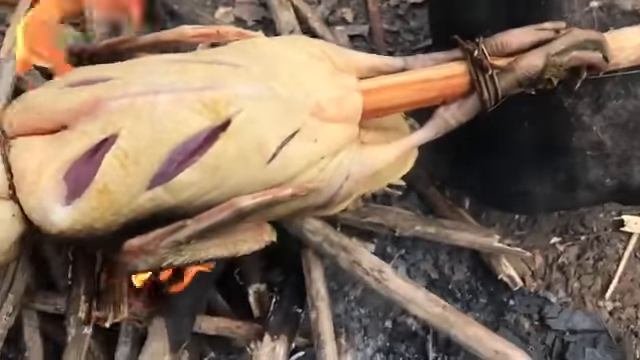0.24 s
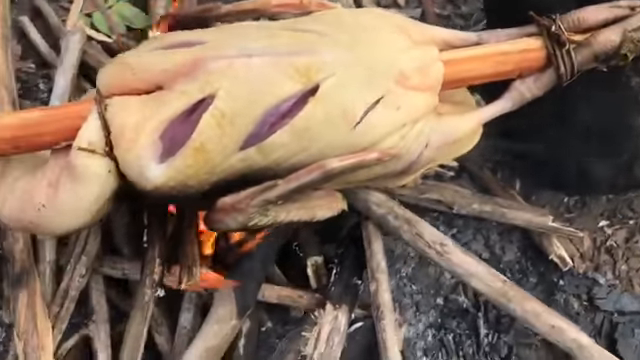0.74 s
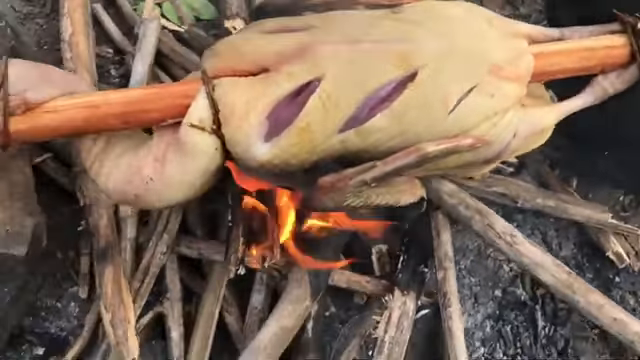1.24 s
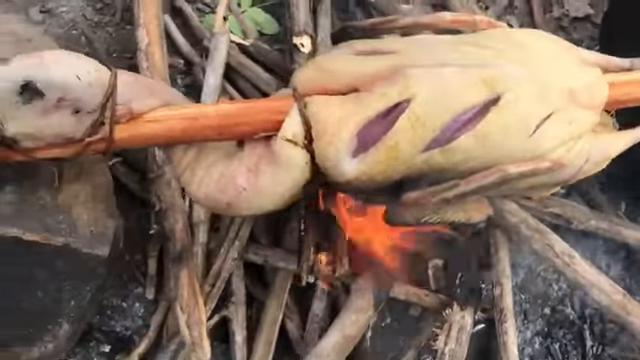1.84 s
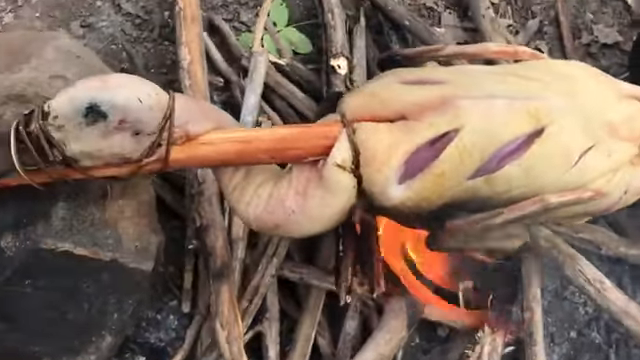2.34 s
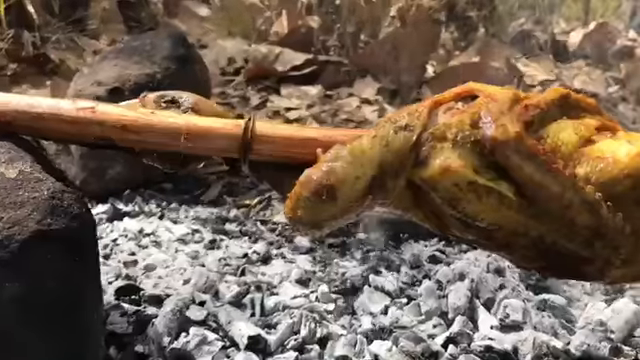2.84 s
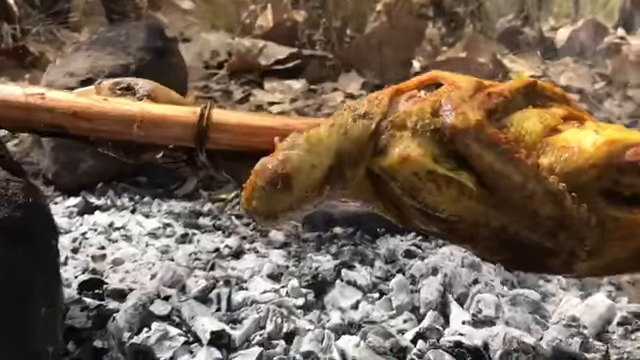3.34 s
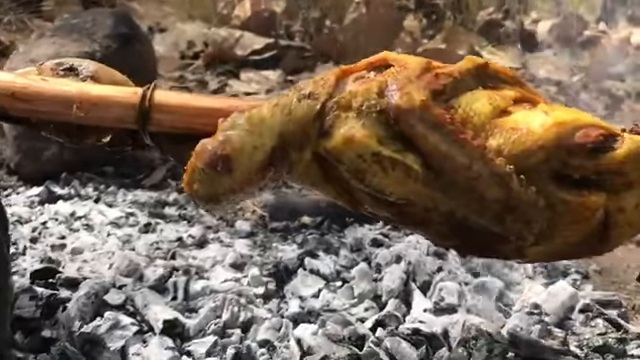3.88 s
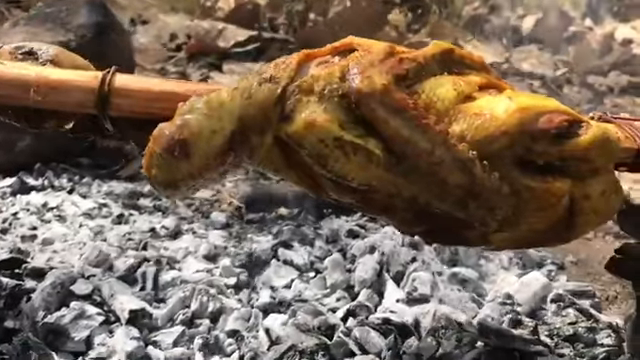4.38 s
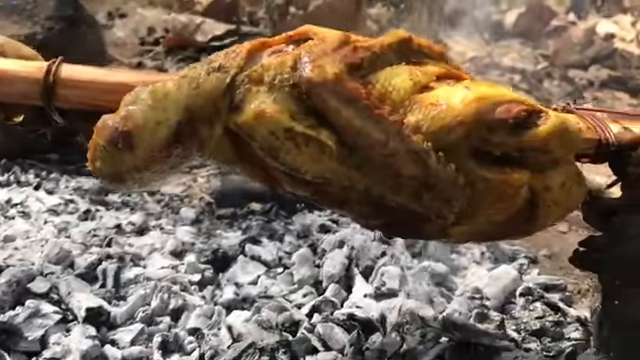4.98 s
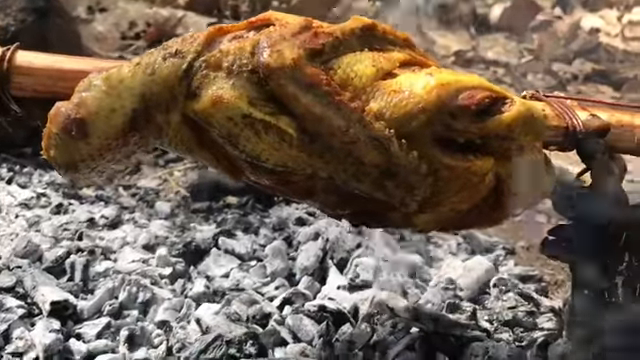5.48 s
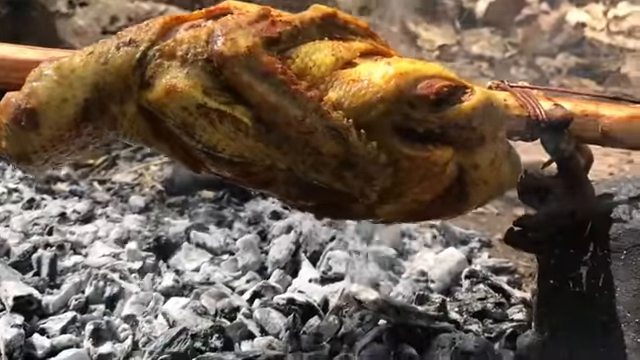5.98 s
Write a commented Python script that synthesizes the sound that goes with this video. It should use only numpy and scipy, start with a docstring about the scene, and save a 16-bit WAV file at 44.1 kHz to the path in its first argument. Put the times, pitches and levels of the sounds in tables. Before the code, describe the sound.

First, burning sticks snap sharply near the microphone, loudest at the start and twice later, amid pattering crackle, sap spits and two rising steam jets above soft low roaring. An abrupt cut and a blink of silence follow. Then a duck over coals sizzles continuously and evenly, with quick fizzing bursts of fat, sparse crisp pops and faint low outdoor wash, without room echo.

```python
"""Loud cracks of burning wood over the deep flutter of flames: a duck roasts outdoors, in mono, in two parts.
First a stick fire: rung fractures crack, showers and fine crackle patter, and shaped noise makes flames and steam.
After a short silence, a bed of coals: a steady frying hiss over a low breeze, made of coloured noise.
Drops of fat spatter in tiny ringing bursts and die away; sharp pops are short fractures rung by the coal bed."""
import sys
import numpy as np
from scipy import signal
from scipy.fft import rfft
from scipy.io import wavfile
from scipy.ndimage import uniform_filter1d, map_coordinates

SR = 44100
rng = np.random.default_rng(int(sys.argv[2]) if len(sys.argv) > 2 else 0)


def unload_audio(sound):
    """Save the sound as a 16-bit wav file, at the path given as the first command line argument."""
    columns = np.transpose(np.atleast_2d(sound))
    # keep every value between -1 and 1, then stretch to whole-number steps
    steps = np.round(np.clip(columns, -1, 1) * 32767)
    wavfile.write(sys.argv[1], SR, steps.astype(np.int16))


N = 274302
TIME, BINS = np.arange(N) / SR, np.fft.rfftfreq(4096, 1 / SR)  # s, Hz
FIRE_END_S, COALS_START_S = 2.614, 2.662
EDGE_HZ, HISS_EDGE_HZ = 15500, 15050  # top of the whole sound, top of the hisses


# Loud cracks of burning wood and charcoal: (time [s], snap level [dB], length [s], brightness [dB],
# leading ring [Hz], thump level [dB], thump pitch before a random rise of up to 5 % [Hz])
CRACKS = [(.0275, -33.5, 0.0021, -8, 1580, -38, 605), (0.0329, -34, 0.0018, -2, 1550, -40, 348),
          (.1714, -45.5, .0012, 2, 3770, -69, 180), (0.4076, -54, 0.00067, -2, 1450, -74, 231),
          (0.5095, -44.5, 0.00077, 14, 1530, -51.5, 555), (0.5293, -45.5, 0.0034, 1, 3520, -73, 300),
          (0.894, -66, 0.0055, 10, 4600, -50.5, 132), (0.9814, -46.5, 0.0011, -1, 3280, -58, 686),
          (1.292, -31, 0.0019, -1, 1620, -35, 516), (1.2963, -35, .0018, -7, 1650, -37, 240),
          (1.446, -47, 0.0011, 7, 3070, -74, 141), (1.4803, -52.5, 0.0017, 5, 4840, -53, 129),
          (1.619, -52, 0.00072, -6.5, 1630, -54, 630), (1.7142, -54.5, .007, -5, 2800, -48, 253),
          (1.87, -42, 0.0066, -1.5, 2680, -55, 200), (1.9152, -42, 0.0054, -9, 1660, -38.5, 547),
          (1.937, -54.5, .0009, 9, 3370, -64, 410), (2.118, -30.5, 0.0045, 1.5, 3070, -39, 141),
          (2.1622, -40.5, 0.011, -3, 2870, -45.5, 550), (2.1804, -43.5, .0013, -4, 3030, -41, 292),
          (2.2834, -52.5, 0.00066, 7, 3900, -55.5, 215), (2.304, -53.5, 0.0038, 0, 3750, -64, 200),
          (2.4712, -44.5, 0.0023, -2.5, 3470, -47.5, 317), (2.5974, -37.5, .0014, -5, 3350, -46, 256),
          (5.691, -43, 0.014, 5, 3300, -57.5, 215)]
# Faint cracks, one at a random moment in each slot
TICKS_PER_S, TICK_DB, TICK_SPREAD_DB = 9, -58, 3
TICK_S, TICK_BRIGHT_DB, TICK_RING_HZ = 0.0017, 3.5, 3300  # middle length and brightness; leading ring
TICK_THUMP_DB, TICK_THUMP_HZ = -61, 169  # middle level and pitch


def cracks():
    """Sudden fractures: loud ones throughout, and faint random ones while the sticks burn."""
    out = np.zeros(N)
    for s, *row in CRACKS:
        add(out, s, crack(*row))
    slots = np.arange(0, FIRE_END_S, 1 / TICKS_PER_S)
    variations = rng.uniform(-1, 1, (len(slots), 5))
    for slot, (late, size, slow, bright, pitch) in zip(slots, variations):
        length = TICK_S * 2 ** slow
        bright_db = TICK_BRIGHT_DB + 6 * bright
        thump_hz = TICK_THUMP_HZ * 2 ** (pitch / 2)
        tick = crack(TICK_DB, length, bright_db, TICK_RING_HZ, TICK_THUMP_DB, thump_hz)
        add(out, slot + late / TICKS_PER_S / 2, amp(TICK_SPREAD_DB * size) * tick)
    return out


# Resonances of the sticks: crackle and splinters vary them in pitch and level, loud and faint cracks
# in level only: (nominal pitch [Hz], width [Hz], nominal relative level [dB])
WOOD_MODES = [(1100, 420, -0.5), (1870, 630, -4), (2555, 220, 2.5), (3850, 450, -2.5), (4070, 430, -6),
              (6760, 3400, -6), (8970, 790, -4), (12530, 4100, -6)]


def crack(db, length, bright_db, ring_hz, thump_db, thump_hz):
    """The break rings the stick, with one leading resonance, and its push adds a hollow thump."""
    modes = WOOD_MODES + [(ring_hz, 0.24 * ring_hz, 1.5)]
    sharp = snap(modes, length, bright_db, tail_db=-10.0, tail_t60=0.066, uneven_db=0.5)
    return amp(db) * sharp + amp(thump_db) * thump(length, thump_hz)


def snap(modes, length, bright_db, tail_db, tail_t60, uneven_db):
    """A fracture: a quick run of uneven slips rings the modes, and things nearby scatter it back."""
    t = np.arange(4096) / SR
    slips = rng.standard_normal(len(t)) * amp(4 * rng.standard_normal(len(t)))
    run = burst(slips * np.exp(-(t / max(length, 1e-4)) ** 2))
    run[0] += 0.39 * np.linalg.norm(run)  # extra push on the first break
    # flatten the run's spectrum, so the colour is that of the modes
    power = uniform_filter1d(abs(rfft(run)) ** 2, size=70)
    run = burst(colour(run, 1 / np.sqrt(power + 1e-3)))
    echo = burst(rng.standard_normal(len(t)) * amp(-60 * t / tail_t60))
    gain = peaks(modes, uneven_db=uneven_db)
    # brightness is the energy of the treble over that of the rest
    treble = 1 / (1 + (5200 / (BINS + 1)) ** 6)
    treble_power = np.sum(gain ** 2 * treble)
    rest_power = np.sum(gain ** 2 * (1 - treble))
    natural_db = 10 * np.log10(treble_power / rest_power)
    gain = gain * amp((bright_db - natural_db) * treble)
    gain = gain / np.sqrt(1 + (BINS / EDGE_HZ) ** 20)
    return burst(colour(run + amp(tail_db) * echo, gain))


# Hollow ring of the woodpile: (pitch before a random rise of up to 5 % [Hz],
# relative level [dB], time to fall 60 dB [s])
PILE_MODES = [(161, -12.5, 0.047), (282, -5.5, 0.027), (366, -5, 0.029), (553, 3.5, 0.019),
              (725, -23, 0.016)]


def thump(length, main_hz):
    """A push sets the stick and the woodpile ringing briefly, as decaying sines."""
    t = np.arange(4096) / SR
    ring = np.zeros(len(t))
    for hz, db, t60 in PILE_MODES + [(main_hz, 3, .028)]:
        cycles = hz * rng.uniform(1.0, 1.05) * t + rng.random()
        ring += amp(db - 60 * t / t60) * np.sin(2 * np.pi * cycles)
    return burst(ring * (1 - np.exp(-2 * t / max(length, 1e-3))))


# Fine crackle of the fire, before its clumping: (time [s], level [dB])
CRACKLE_CURVE = [(0, -66), (.6, -65.5), (1.5, -69), (2.1, -64), (2.6, -63.5)]
CRACKLE_SWELL_DB, CRACKLE_SWELLS_PER_S = 3, 13.97  # it comes in clumps
BOIL_DB = -14  # crackle of the sap that feeds a jet, against the jet


def crackle(steam):
    """Tiny fractures ring the sticks in clumps, and louder as boiling sap feeds the steam."""
    clumps = amp(CRACKLE_SWELL_DB * wander(CRACKLE_SWELLS_PER_S))
    strength = level(CRACKLE_CURVE) * clumps + amp(BOIL_DB) * steam
    return strength * grains(WOOD_MODES, per_s=700, spread_db=5.0)


# Showers of splinters on the woodpile: (time [s], length [s], rattle level [dB], knocking level [dB])
SHOWERS = [(0.043, 0.021, -52, -53), (0.086, 0.035, -52, -68), (0.175, .018, -51.5, -68),
           (1.306, .038, -43, -46.5), (2.126, 0.034, -49, -47.5), (2.195, 0.017, -49.5, -52),
           (2.455, 0.07, -52.5, -53.5)]
KNOCKS_PER_S, KNOCK_HZ = 400, 250  # average rate; pitch before a random rise of up to 5 %


def showers():
    """Around the cracks, splinters rattle among the sticks and knock on the hollow pile."""
    rattle, knocking = np.zeros(N), np.zeros(N)
    for s, length, db, knock_db in SHOWERS:
        falling = (TIME > s) * np.exp(-(since(s) / length) ** 4)
        rattle += amp(db) * falling
        knocking += amp(knock_db) * falling
    knocks = rng.standard_normal(N) * (rng.random(N) < KNOCKS_PER_S / SR)
    ring = thump(0.0008, main_hz=KNOCK_HZ)
    pile = signal.oaconvolve(knocking * unit(knocks), ring / np.linalg.norm(ring))[:N]
    return rattle * grains(WOOD_MODES, per_s=3300, spread_db=3.0) + pile


# Short spits of sap, each a rising fizz:
# (time [s], length [s], level before the fades [dB], first pitch [Hz], last pitch [Hz])
SPITS = [(0.463, 0.021, -49, 5560, 7500), (0.478, 0.068, -52.5, 9500, 11000),
         (2.008, 0.04, -49, 5840, 11800)]


def spits():
    """Sputtering sap: ragged noise in a broad resonance that rises as the pocket empties."""
    out = np.zeros(N)
    for s, length, db, first_hz, last_hz in SPITS:
        hz = np.linspace(first_hz, last_hz, round(length * SR))
        ragged = unit(uniform_filter1d(rng.standard_normal(len(hz)), size=60))
        sputter = rng.standard_normal(len(hz)) * amp(3.5 * ragged)
        # shift the moving pitch down to zero, smooth there (2500 Hz wide), and shift back
        turn = np.exp(2j * np.pi * np.cumsum(hz) / SR)
        r = np.exp(-np.pi * 2500 / SR)
        fizz = (turn * signal.lfilter([1 - r], [1, -r], sputter / turn)).real
        fade = signal.windows.tukey(len(hz), .4)
        add(out, s, amp(db) * unit(fizz + 0.097 * sputter) * fade)
    return out


# Jets of steam from the sticks: (start [s], release [s], level at the release [dB])
VENTS = [(0.741, 1.122, -46), (2.262, 2.622, -50)]
VENT_ATTACK_S, VENT_SWELL_DB_PER_S, VENT_RELEASE_S = .12, 20, 0.0348


def steam_pressure():
    """Each vent opens, swells slowly and closes: (gain, openness 0-1) over time."""
    gain, openness = np.zeros(N), np.zeros(N)
    for start, release, db in VENTS:
        opening = np.sin(np.pi / 2 * np.minimum(since(start) / VENT_ATTACK_S, 1)) ** 2
        closing = np.exp(-since(release) / VENT_RELEASE_S)
        swell_db = db + VENT_SWELL_DB_PER_S * np.minimum(TIME - release, 0)
        gain += amp(swell_db) * opening * closing
        openness = np.maximum(openness, (TIME > start) * closing)
    return gain, openness


# Resonances of the split that the steam leaves by:
# (pitch before it slides [Hz], width [Hz], relative level [dB])
JET_MODES = [(3350, 640, -3.5), (4000, 540, -4), (5470, 210, 2.5), (6170, 830, -2), (7500, 290, -14),
             (8650, 1400, 0.5), (9560, 320, 1), (11600, 2800, 1), (13900, 880, -1)]
VENT_PITCH_RISE, VENT_DULL_HZ = .02, 8000  # share of pitch from no to full pressure; treble cut on closing
VENT_WAVER, VENT_WAVERS_PER_S = .008, 12  # random waver, as a share of the pitch


def jets(gain, openness):
    """Steam hisses through a split; resonances slide with pressure, and closing dulls the treble."""
    pressure = gain / gain.max()
    pitch = 1 + VENT_PITCH_RISE * (pressure - .5) + VENT_WAVER * wander(VENT_WAVERS_PER_S)
    noise = hiss(peaks(JET_MODES), flicker_db=0.2, per_s=210)
    # read the noise at a changing speed to slide its resonances
    sliding = map_coordinates(noise, [np.cumsum(pitch) % (N - 1)], order=5, mode="mirror")
    dull = signal.sosfiltfilt(signal.butter(2, VENT_DULL_HZ, fs=SR, output="sos"), sliding)
    return gain * (openness * lowpass(sliding, HISS_EDGE_HZ) + (1 - openness) * dull)


# Deep flutter of the flames, with low thuds at the loud cracks, before a lift of 2.5 dB:
# (time [s], level [dB])
FLAME_CURVE = [(0.0, -48), (0.51, -54), (0.53, -59.5), (0.82, -57.5), (0.89, -61.5), (1.29, -65.5),
               (1.32, -58), (1.7, -68), (1.73, -54), (2.1, -58), (2.13, -48), (2.23, -66), (2.6, -59.5)]
# Colour of the flutter and thuds: (frequency [Hz], relative level [dB per Hz])
FLUTTER_COLOUR = [(20, -14.5), (35, -5.5), (50, -1.5), (68, -10), (100, -19), (180, -25.5), (400, -55)]
# Colour of the roar: (frequency [Hz], relative level [dB per Hz])
ROAR_COLOUR = [(50, -30), (110, 3.5), (170, 3.5), (300, 0.5), (430, -3.5), (560, -9.5), (800, -25),
               (2000, -56)]
ROAR_DB = -63


def flames():
    """Deep noise makes the flutter, with low thuds at the loud cracks, over a roar at a steady level."""
    flutter_and_thuds = amp(2.5) * level(FLAME_CURVE) * hiss(shape(FLUTTER_COLOUR), flicker_db=1, per_s=13)
    roar = amp(ROAR_DB) * hiss(shape(ROAR_COLOUR), flicker_db=1.5, per_s=48)
    return flutter_and_thuds + roar


# Colour of the air round the fire: (frequency [Hz], relative level [dB per Hz])
AIR_COLOUR = [(290, -33), (500, -7), (2200, -12.5), (2390, -11), (3000, -15), (3320, -13), (4940, -16.5),
              (6760, -19), (15000, -21.5)]
AIR_DB = -62


def fire_air():
    """The air round the fire is a broad flickering hiss."""
    return amp(AIR_DB) * hiss(shape(AIR_COLOUR), flicker_db=1.9, per_s=53)


def fire():
    """Crackling sticks and steam, returned by close surfaces, over the flames and the air."""
    steam, openness = steam_pressure()
    wood = crackle(steam) + showers() + spits() + jets(steam, openness)
    return nearby(wood) + flames() + fire_air()


# Ring of tiny bursting fat bubbles, its pitch and level varying from spot to spot:
# (nominal pitch [Hz], width [Hz], nominal relative level [dB])
FAT_MODES = [(1990, 1200, -16.5), (4130, 990, -7), (6950, 1800, -13.5), (9570, 1000, -5.5),
             (11750, 1300, -3.5), (13400, 1200, -5)]
# Drops of fat landing on the coals: (time [s], level before attack and decay [dB])
DRIPS = [(3.479, -41), (3.533, -41.5), (3.625, -53), (3.684, -46)]
DRIP_ATTACK_S, DRIP_DECAY_S = 0.0038, 0.035  # each drop boils off at once in a dense fizz
AFTER_DB, AFTER_DECAY_S, AFTER_PER_S = -10.5, .24, 110  # its droplets burst singly; dB against the drop
SIMMER_DB = -63.5


def spatter():
    """Fat simmers all the time; each drop adds a quick dense fizz and a longer spray of separate bursts."""
    def boiling(decay_s):
        """Strength of all the drops together, each dying away in decay_s."""
        each = []
        for s, db in DRIPS:
            attack = np.minimum(since(s) / DRIP_ATTACK_S, 1)
            each.append(amp(db) * attack * np.exp(-since(s) / decay_s))
        return np.linalg.norm(each, axis=0)
    simmer = amp(SIMMER_DB) * grains(FAT_MODES, per_s=1300, spread_db=4.5)
    fizz = boiling(DRIP_DECAY_S) * grains(FAT_MODES, per_s=3000, spread_db=3.5)
    spray = amp(AFTER_DB) * boiling(AFTER_DECAY_S) * grains(FAT_MODES, per_s=AFTER_PER_S, spread_db=0)
    return simmer + fizz + spray


# Resonances of the coal bed, their levels varying from pop to pop:
# (pitch [Hz], width [Hz], nominal relative level [dB])
COAL_MODES = [(2360, 430, -2), (3210, 570, 0.5), (4550, 390, -5), (5330, 320, -6), (6830, 2600, -4.5),
              (8750, 820, -5.5), (9900, 400, -9), (11450, 1100, 2), (13200, 920, 1.5), (14400, 800, 4)]
# Loud pops of fat and embers on the coals: (time [s], level [dB], length [s], brightness [dB])
POPS = [(3.249, -49, .0009, 11), (3.308, -50, .0004, 9), (3.4793, -42, 0.0012, 18),
        (3.602, -37.5, .0003, 11), (3.7838, -39.5, .0005, 25), (3.8304, -46, .001, 30),
        (3.958, -49, .0004, 10), (3.991, -42, 0.00034, 20), (4.238, -51, .0008, 14),
        (4.476, -49.5, .0005, 5), (5.339, -43.5, .00045, 18), (5.4732, -28.5, 0.00074, 6)]


def pops():
    """Fat and embers burst sharply and ring the coal bed."""
    out = np.zeros(N)
    for s, db, length, bright_db in POPS:
        pop = snap(COAL_MODES, length, bright_db, tail_db=-11.5, tail_t60=0.039, uneven_db=4.0)
        add(out, s, amp(db) * pop)
    return out


# Colour of the frying hiss: (frequency [Hz], relative level [dB per Hz])
FRY_COLOUR = [(530, -26), (900, -4.5), (1680, -4.5), (2660, -0.5), (3290, -4), (4160, -3), (4790, -6),
              (5260, -2), (6130, -3.5), (7150, -4), (9700, -4), (10300, -9.5), (11300, -3), (12900, -2.5),
              (15000, -2.5)]
FRY_DB = -55


def frying():
    """The coals fry with a steady bright hiss that flickers very fast."""
    return amp(FRY_DB) * hiss(shape(FRY_COLOUR), flicker_db=0.73, per_s=200)


# Colour of the low outdoor wash: (frequency [Hz], relative level [dB per Hz])
BREEZE_COLOUR = [(15, -40), (25, -24), (38, -2.5), (59, -1.5), (134, -9), (165, -10.5), (248, -12.5),
                 (432, -18), (525, -17), (708, -18.5), (900, -24.5), (1170, -58), (1980, -120)]
BREEZE_DB = -62.5


def breeze():
    """The breeze is a low wash of noise at a steady level."""
    return amp(BREEZE_DB) * hiss(shape(BREEZE_COLOUR), flicker_db=1, per_s=26)


def coals():
    """Fat spatters and pops on the frying coals, over a low breeze."""
    return spatter() + pops() + frying() + breeze()


# Early reflections off sticks, stones and ground: (delay [s], gain against the direct sound [ratio])
REFLECTIONS = [(.00061, 0.31), (.00091, 0.048), (.00125, 0.25), (.00249, 0.12), (.0055, 0.098)]


def nearby(x):
    """Close surfaces return each sound at once and comb its spectrum."""
    comb = 1 + sum(gain * np.exp(-2j * np.pi * BINS * delay) for delay, gain in REFLECTIONS)
    return colour(x, unit(abs(comb)))


def hiss(gain, flicker_db, per_s):
    """Coloured noise of rms 1 whose strength drifts to a new random value per_s times a second."""
    knots = rng.standard_normal(4000)
    flicker = np.interp(TIME * per_s, np.arange(len(knots)), knots)
    noise = lowpass(colour(rng.standard_normal(N), gain), HISS_EDGE_HZ)
    return unit(noise * amp(flicker_db * flicker))


def grains(modes, per_s, spread_db, count=8):
    """Random tiny bursts of rms 1 from several spots, each with its own ring; spread makes a few large."""
    out = np.zeros(N)
    for _ in range(count):
        size = amp(spread_db * np.minimum(rng.exponential(1, N), 3.5)) * rng.choice([-1, 1], N)
        strikes = size * (rng.random(N) < per_s / count / SR)
        out += colour(strikes, peaks(modes, rng.uniform(1.0, 1.13), uneven_db=3.0))
    return unit(out)


def peaks(modes, shift=1, uneven_db=0):
    """Gain per bin of steep-sided resonances on a weak broad base; small sources radiate little bass."""
    power = np.zeros(len(BINS))
    for hz, width, db in modes:
        height = amp(db + uneven_db * rng.standard_normal()) ** 2
        power += height / (1 + (1.27 * (BINS - hz * shift) / width) ** 2) ** 2
    return np.sqrt(power + amp(-24.0) ** 2 * power.max()) * BINS / np.hypot(BINS, 700)


def shape(points):
    """Gain per bin from a short spectrum of (frequency [Hz], level [dB])."""
    hz, db = np.transpose(points)
    return amp(np.interp(np.log(BINS + 1), np.log(hz + 1), db))


def colour(x, gain):
    """Causal (minimum-phase) filter with the given gain per bin."""
    log_gain = np.log(np.maximum(gain, 1e-5))
    circle = np.concatenate([log_gain, log_gain[-2:0:-1]])
    taps = np.fft.ifft(np.exp(np.conj(signal.hilbert(circle)))).real
    return signal.oaconvolve(x, taps)[:len(x)]


def lowpass(x, hz):
    """Steep treble cut without delay."""
    return signal.oaconvolve(x, signal.firwin(601, hz, window=("kaiser", 8), fs=SR), "same")


def wander(per_s):
    """A random curve of about unit size that heads for a new value per_s times a second."""
    knots = rng.standard_normal(400)
    return np.interp(TIME * per_s, np.arange(len(knots)), knots)


def level(rows):
    """Gain over time from a curve of (time [s], level [dB])."""
    return amp(np.interp(TIME, *np.transpose(rows)))


def since(s):
    """Time gone by since s; zero before."""
    return np.maximum(TIME - s, 0)


def add(mix, s, sound):
    """Lays a sound into the mix from s seconds on."""
    part = mix[max(round(s * SR), 0):][:len(sound)]
    part += sound[:len(part)]


def amp(db):
    """Gain from decibels."""
    return 10 ** (np.asarray(db) / 20)


def unit(x):
    """Scales to rms 1."""
    return x / np.sqrt(np.mean(x ** 2) + 1e-20)


def burst(x):
    """Scales a short sound to the energy of rms 1 over a hundredth of a second."""
    return x / np.sqrt(np.sum(x ** 2) * 100 / SR + 1e-20)


def scene():
    """The fire stops dead; after a short silence the coals come in. Both channels are the same."""
    fire_on = np.clip((FIRE_END_S - TIME) / 0.00049, 0, 1)
    coals_on = np.clip((TIME - COALS_START_S) / 0.016, 0, 1)
    mono = nearby(cracks()) * (fire_on + coals_on) + fire() * fire_on + coals() * coals_on
    return np.array([mono, mono])


def record(dry):
    """The microphone sheds the deepest bass; then the top is band-limited."""
    dry = signal.sosfilt(signal.butter(2, 33, "high", fs=SR, output="sos"), dry)
    return np.array([lowpass(channel, EDGE_HZ) for channel in dry])


dry = scene()
out = record(dry)
unload_audio(out)
```